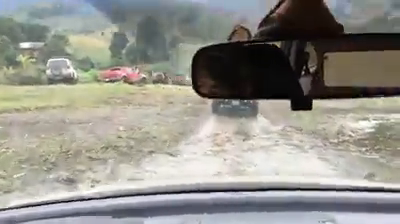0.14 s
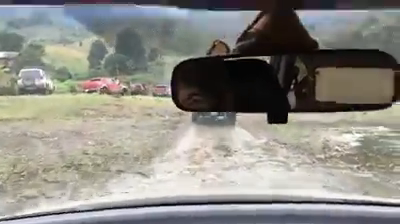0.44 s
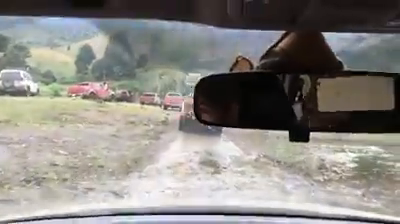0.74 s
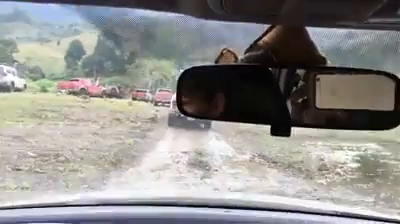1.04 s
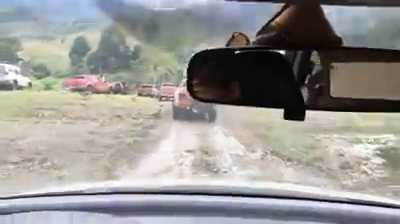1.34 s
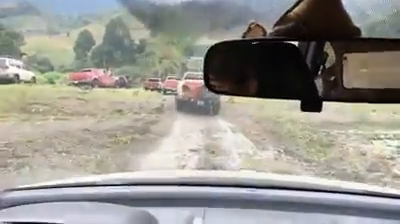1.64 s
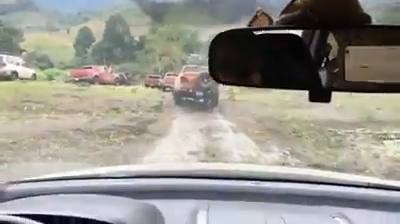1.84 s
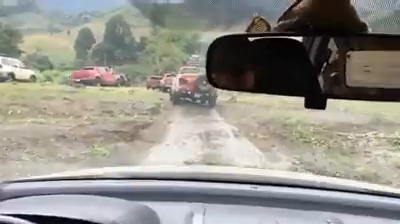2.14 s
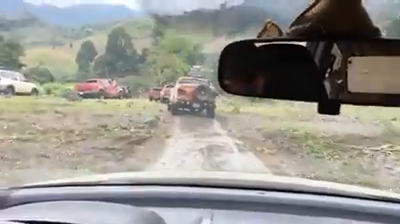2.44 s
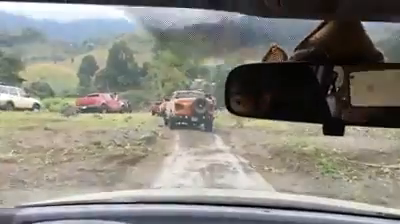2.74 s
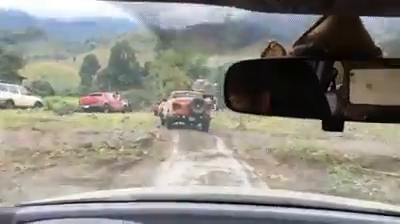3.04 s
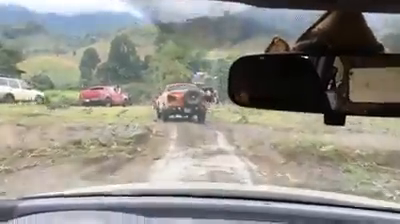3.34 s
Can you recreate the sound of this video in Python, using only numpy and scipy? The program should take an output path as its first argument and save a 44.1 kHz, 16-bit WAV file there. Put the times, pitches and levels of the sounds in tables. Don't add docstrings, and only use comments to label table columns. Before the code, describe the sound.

Inside a crawling pickup, low tyre and diesel rumble with bumps, water spray and rattles

```python
import sys
import numpy as np
from scipy import signal
from scipy.fft import rfft, irfft
from scipy.io import wavfile
from scipy.ndimage import uniform_filter1d

SR = 44100
rng = np.random.default_rng(int(sys.argv[2]) if len(sys.argv) > 2 else 0)


def wrap_up_sound(samples):
    columns = np.atleast_2d(samples).T
    tamed = np.clip(columns, -1, 1)
    steps = np.round(tamed * 32767).astype(np.int16)
    wavfile.write(sys.argv[1], SR, steps)


def volts_from_db(level):
    exponent = np.asarray(level, float) / 20
    return 10 ** exponent


N = 154350

# t/s, firing rate/Hz, load/dB
ENGINE_RUN = [(0, 28, -61.5), (.06, 28, -55.5), (.18, 27, -55), (.24, 26, -56), (.35, 25.5, -54.5),
              (.65, 25, -55.5), (.8, 23, -53), (1.1, 24.2, -49), (1.42, 23, -50), (1.6, 22, -49),
              (1.71, 21, -52.5), (1.98, 19.9, -47.5), (2.16, 21, -52), (2.3, 22.8, -51.5),
              (2.75, 18.3, -54), (3.5, 20.5, -55)]
# f/Hz, width/Hz, level/dB
BAY_MODES = [(550, 400, 6), (785, 830, 8.5), (1045, 600, 9), (1430, 264, 3.5), (1677, 350, 4),
             (1980, 170, -3.5), (3300, 570, -21)]
# t/s, spray level/dB
WATER = [(0, -59), (.6, -59), (.78, -55), (1.0, -53.5), (1.35, -51.5), (1.42, -52), (1.53, -50.5),
         (1.58, -51), (1.65, -49.5), (1.8, -52.5), (2.0, -49.5), (2.33, -50), (2.41, -53), (2.75, -54),
         (3.0, -57.5), (3.5, -61)]
# f/Hz, density/dB
SPRAY_SPECTRUM = [(1470, -34.5), (2500, -4), (4370, -8), (4940, -9), (6310, -9.5), (9540, -16.5),
                  (10500, -18.5), (11600, -19.5), (15600, -23.5)]
# t/s, rumble level/dB
ROUGHNESS = [(0.0, -27.5), (0.42, -23.5), (0.8, -28.5), (1.13, -22.5), (2.32, -27), (2.62, -28.5),
             (2.85, -30), (3.5, -28.5)]
# f/Hz, density/dB
ROAD_SPECTRUM = [(11, -26), (18, -5), (49, -5), (111, -5.5), (139, -10.5), (346, -32), (520, -46.5),
                 (680, -47.5), (1140, -120)]
# t/s, length/s, level/dB, f/Hz
RUTS = [(.11, 0.078, -26, 53.1), (.22, 0.052, -22, 39.9), (.4, 0.12, -20, 40.1), (.6, 0.084, -22.5, 60.66),
        (.745, 0.1, -18.5, 50.04), (.95, 0.083, -20, 52), (1.04, 0.094, -19, 44.85),
        (1.14, 0.063, -18, 37.76), (1.3, 0.15, -17.5, 39), (1.43, 0.066, -23.5, 58.3),
        (1.525, 0.062, -17.5, 42), (1.625, 0.082, -24.5, 47.62), (1.78, 0.14, -20.5, 40.8),
        (1.955, 0.071, -19.5, 39.43), (2.06, 0.16, -19.5, 40), (2.265, 0.054, -21, 58.7),
        (2.385, 0.11, -20, 45.8), (2.5, 0.095, -19.5, 40.26), (2.632, 0.037, -18, 44.3),
        (2.79, 0.054, -16.5, 56), (2.85, 0.046, -17, 45.9), (2.92, 0.09, -29.5, 49.3),
        (3.01, 0.046, -19, 47.1), (3.16, 0.023, -20, 50.87), (3.2, 0.029, -21.5, 44.15),
        (3.25, .035, -25, 52.2), (3.355, 0.029, -21.5, 42.03), (.3, 0.075, -27, 33.5),
        (.62, 0.11, -32, 29.87), (.86, 0.078, -23.5, 38), (3.07, 0.032, -25, 49.9), (.02, 0.075, -28, 32.7)]
# t/s, length/s, level/dB, f/Hz
JOLTS = [(.02, 0.039, -21, 102.5), (.15, 0.075, -25, 96.1), (.4, 0.084, -15.5, 75.2), (.43, 0.12, -20, 128),
         (.76, 0.012, -32, 111), (.91, 0.047, -26, 102.7), (1.09, 0.045, -17.5, 90.3),
         (1.19, 0.045, -19, 93.5), (1.28, 0.043, -15.5, 120), (1.37, 0.031, -43, 90),
         (1.53, 0.13, -27.5, 85), (1.67, 0.031, -14.5, 89.7), (1.82, 0.03, -21, 119.9),
         (2.0, 0.039, -16, 129.7), (2.08, 0.05, -17, 116.4), (2.25, 0.023, -21.5, 107),
         (2.35, 0.034, -21, 115.7), (2.43, 0.065, -20, 114.2), (2.63, 0.048, -24.5, 112),
         (2.84, 0.077, -24, 82.6), (2.91, 0.01, -8.5, 95.6), (2.963, 0.019, -10, 105),
         (3.4, 0.035, -27, 113.5), (.185, 0.052, -20, 66.5), (.53, 0.021, -18, 110), (.65, 0.05, -21, 70),
         (2.51, 0.031, -17, 68), (2.72, 0.058, -26.5, 75), (3.1, 0.029, -30, 105.2),
         (3.0, 0.043, -27.5, 100), (1.6, 0.048, -28, 130.1), (2.17, 0.033, -29.5, 74.7),
         (3.45, 0.028, -23, 90)]
# t/s, peak level/dB, f/Hz, t60/s
MUD_LUMPS = [(.174, -56, 2470, 0.037), (.257, -44, 3440, 0.041), (.3, -33, 1300, 0.038),
             (.335, -46.5, 4000, 0.063), (0.044, -53, 5600, 0.05), (.936, -45, 2800, 0.18),
             (.96, -47, 6615, .05), (.934, -50, 6500, 0.045), (1.195, -41.5, 1600, 0.048),
             (0.97, -44, 1500, .08), (1.4, -52, 5000, 0.043), (2.1, -53.5, 4933, 0.076),
             (2.012, -43.5, 10800, 0.044), (2.68, -44.5, 4400, 0.037), (3.09, -40, 1700, 0.032),
             (1.2, -45, 6300, .05), (.74, -55, 3000, .06), (3.481, -45.5, 2500, 0.14)]
# t/s, peak level/dB, f/Hz, t60/s
STONES = [(.17, -41, 156, 0.073), (.28, -38.5, 303, 0.19), (.735, -35, 400, 0.063), (.8, -21, 191.3, 0.11),
          (1.15, -15, 174, 0.05), (1.285, -24.5, 160.8, 0.3), (1.66, -28, 220, 0.1), (1.77, -26, 220, 0.07),
          (2.004, -18, 174.4, 0.17), (2.04, -26, 292, 0.1), (2.45, -29, 188, 0.35),
          (2.912, -16.5, 189, 0.048), (2.958, -18, 150.5, 0.082), (.092, -27.5, 198, 0.094),
          (.329, -28, 240, 0.057), (.378, -31, 205, 0.062), (.483, -31, 190, 0.061),
          (.635, -36, 239, 0.055), (.951, -44, 237, .07), (1.044, -30, 257, 0.1), (1.359, -33, 190, .07),
          (1.574, -34, 270, 0.12), (1.83, -30, 222, 0.07), (2.286, -36, 218, .07), (2.75, -33, 302, 0.069),
          (2.008, -19, 211, 0.055)]
# t/s, peak level/dB, f/Hz, t60/s
PANELS = [(.138, -50, 1220, .12), (1.65, -44, 535, .15), (1.76, -45, 1700, .15), (1.865, -48, 1700, .12),
          (1.895, -50, 1040, .1), (2.027, -42, 1030, .1), (2.08, -45, 1700, .1), (2.43, -50, 980, .1),
          (2.465, -46, 1980, .09), (2.505, -48, 1650, .08), (2.545, -46, 1000, .08), (2.63, -47, 1950, .1),
          (2.69, -54, 3300, .07), (3.095, -49, 1950, .06), (.78, -49, 1654, .12), (1.075, -49, 1570, .1),
          (1.22, -46, 2450, .08), (3.29, -48, 1760, .08), (.7, -53, 2030, .07), (1.178, -48, 6000, 0.074),
          (1.38, -53, 6300, .12), (2.05, -31, 270, .15)]
# t/s, peak level/dB, f/Hz, t60/s
TRIM = [(.736, -37.5, 793, 0.1), (.77, -41.5, 1110, 0.063), (1.045, -40.5, 550, 0.21),
        (1.071, -39.5, 950, 0.073), (1.526, -34.5, 790, 0.032), (.175, -47, 810, 0.089),
        (1.6, -44, 1000, 0.11), (2.002, -30.5, 720, 0.1), (2.027, -45, 1015, 0.15),
        (2.376, -31, 741, 0.075), (2.945, -43, 1200, 0.063), (.37, -43, 966, 0.09)]
# f/Hz, width/Hz, depth (0-1)
DASH_DIPS = [(2674, 300, 0.36), (4950, 460, 0.35), (7600, 500, 0.26), (10400, 530, 0.3)]


def unit(x):
    return x / np.sqrt(np.mean(x ** 2))


def curve(table, column):
    points = np.array(table)
    return np.interp(np.arange(N) / SR, points[:, 0], points[:, column])


def walk(rate_hz):
    hold = int(SR / rate_hz)
    steps = np.repeat(rng.standard_normal(N // hold + 1), hold)
    slewed = uniform_filter1d(uniform_filter1d(steps, hold), hold)
    return unit(slewed[:N])


def band(x, f_hz, width_hz):
    b, a = signal.iirpeak(min(f_hz, .45 * SR), f_hz / width_hz, SR)
    return signal.lfilter(b, a, x)


def colour(x, spectrum):
    f_hz, level_db = np.array(spectrum).T
    bins_hz = np.maximum(np.arange(N // 2 + 1) * SR / N, 1)
    gain_db = np.interp(np.log(bins_hz), np.log(f_hz), level_db, left=-80)
    return unit(irfft(rfft(x) * volts_from_db(gain_db), N))


def swells(table, gain_db, wobble, overtone):
    spread, flutter_db = 1.48, 1.3
    out, t = np.zeros(N), np.arange(N) / SR
    drift = 1 + wobble * walk(30)
    for (start_s, length_s, db, f_hz), turn in zip(table, rng.random(len(table))):
        middle_s = start_s + length_s / 2
        progress = np.clip((t - middle_s) / (length_s * spread) + .5, 0, 1)
        angle = 2 * np.pi * (np.cumsum(f_hz * drift) / SR + turn)
        cycle = np.sin(angle) + overtone * np.sin(2 * angle)
        out += volts_from_db(db + gain_db) * np.sin(np.pi * progress) * cycle
    return out * volts_from_db(flutter_db * walk(25.29))


def hits(table, width, rise_s, tone):
    out = np.zeros(N + SR)
    t = np.arange(SR // 2) / SR
    for start_s, db, f_hz, t60_s in table:
        noise = rng.standard_normal(len(t))
        body = unit(band(band(noise, f_hz, f_hz * width), f_hz, f_hz * width))
        ring = body + tone * np.sin(2 * np.pi * f_hz * t)
        envelope = volts_from_db(db - 60 * (t / t60_s) ** 1.248) * (1 - np.exp(-t / rise_s))
        start = int(start_s * SR)
        out[start:start + len(t)] += envelope * ring
    return out[:N]


def engine():
    firing_scatter_db, puff_decay_cycles, puff_rise_s, steady = 1.6, .45, .009, 1.1
    rattle_db, rattles_per_s, throb_db = 1.4, 22, 15
    phase = np.cumsum(curve(ENGINE_RUN, 1) * (1 + .04 * walk(12))) / SR
    size = volts_from_db(firing_scatter_db * rng.standard_normal(N // 100))[phase.astype(int)]
    puff = uniform_filter1d(size * np.exp(-(phase % 1) / puff_decay_cycles), int(puff_rise_s * SR))
    gas = (steady + puff) * rng.standard_normal(N)
    clatter = np.zeros(N)
    for f_hz, width_hz, db in BAY_MODES:
        mode = unit(band(band(gas, f_hz, width_hz), f_hz, 3 * width_hz))
        clatter += volts_from_db(db + rattle_db * walk(rattles_per_s)) * mode
    throb = unit(band(band(puff, 130, 105), 105.4, 120))
    return volts_from_db(curve(ENGINE_RUN, 2) + 5.5) * (unit(clatter) + volts_from_db(throb_db) * throb)


def spray():
    drops_per_s, drop_scatter_db, drop_share = 2500, 2.2, .45
    gust_db, gusts_per_s = 1.2, 24
    brighten, dry_db = .31, -56
    landed = rng.random(N) < drops_per_s / SR
    drops = landed * volts_from_db(drop_scatter_db * rng.exponential(size=N)) * rng.standard_normal(N)
    hiss = rng.standard_normal(N)
    water = colour(drop_share * unit(drops) + hiss, [(500, 8.75)] + SPRAY_SPECTRUM)
    wet_db, out = curve(WATER, 1), np.zeros(N)
    for k, f_hz in enumerate(1000 * 2. ** np.arange(0, 4.1, .5)):
        tilt_db = brighten * (k - 5) / 2 * (wet_db - dry_db)
        out += volts_from_db(tilt_db + gust_db * walk(gusts_per_s)) * band(water, f_hz, f_hz / 3)
    return volts_from_db(wet_db) * out


def road():
    clods = volts_from_db(1.3 * walk(60)) * rng.standard_normal(N)
    return volts_from_db(curve(ROUGHNESS, 1) + 3) * colour(clods, ROAD_SPECTRUM + [(900, -75.5)])


def cab_booms():
    return swells(RUTS, gain_db=4, wobble=.07, overtone=.25)


def floor_shudders():
    return swells(JOLTS, gain_db=0, wobble=.04, overtone=0)


def mud_splats():
    return hits(MUD_LUMPS, width=1.1, rise_s=.003, tone=0)


def stone_thumps():
    return hits(STONES, width=.45, rise_s=.0097, tone=1.36)


def panel_rings():
    return hits(PANELS, width=.12, rise_s=.007, tone=.8)


def trim_knocks():
    return hits(TRIM, width=.95, rise_s=.003, tone=.4)


def scene():
    mix = engine() + spray() + road()
    mix = mix + cab_booms() + floor_shudders()
    mix = mix + mud_splats() + stone_thumps() + panel_rings() + trim_knocks()
    for f_hz, width_hz, depth in DASH_DIPS:
        mix = mix - depth * band(mix, f_hz, width_hz)
    return mix[None]


def roll_off(x):
    return signal.sosfilt(signal.butter(12, 15710, fs=SR, output="sos"), x)


def record(dry):
    limited = np.tanh(1.7 * dry) / 1.868
    return roll_off(limited)


dry = scene()
out = record(dry)
wrap_up_sound(out)
```